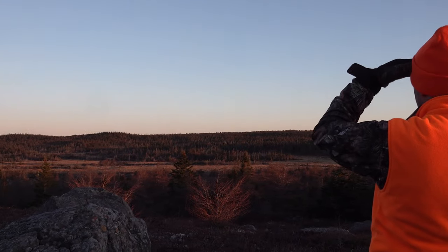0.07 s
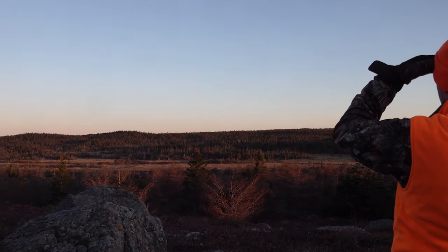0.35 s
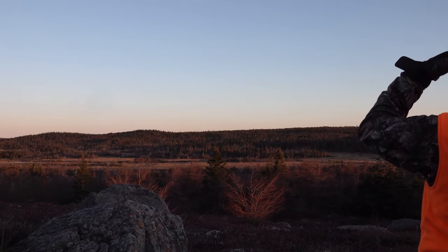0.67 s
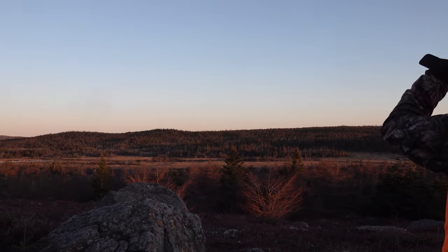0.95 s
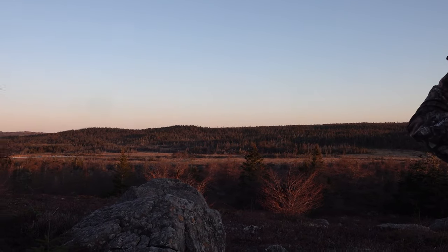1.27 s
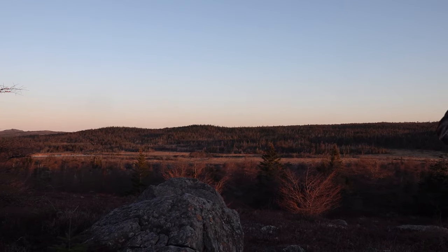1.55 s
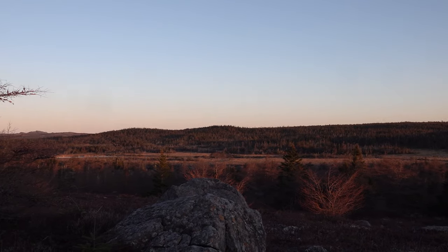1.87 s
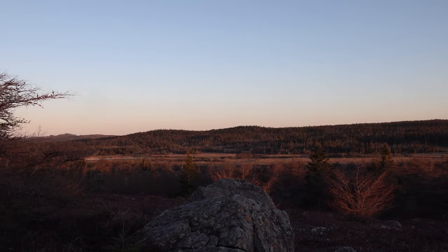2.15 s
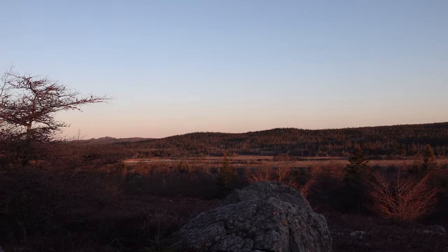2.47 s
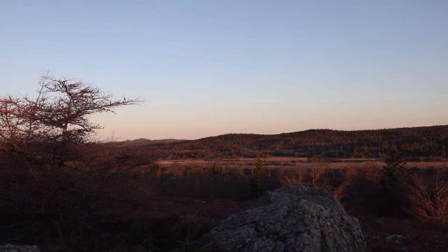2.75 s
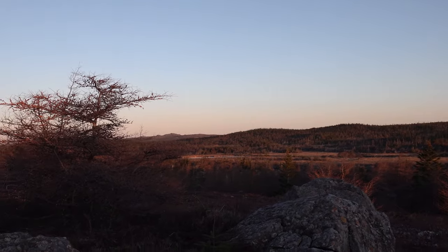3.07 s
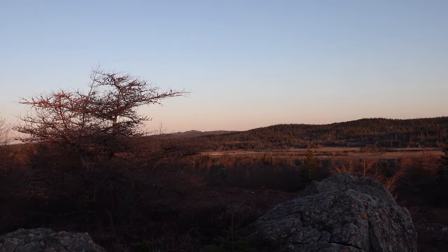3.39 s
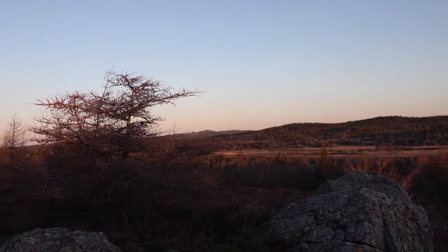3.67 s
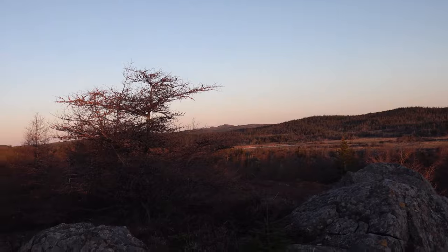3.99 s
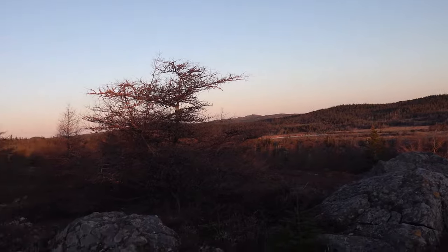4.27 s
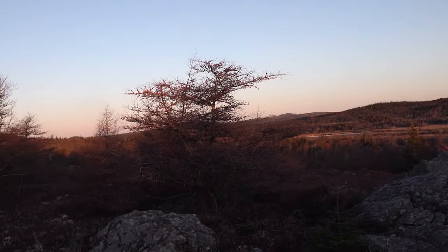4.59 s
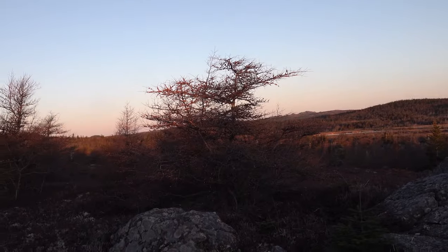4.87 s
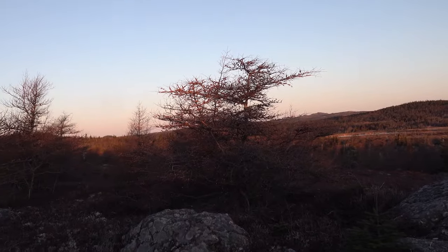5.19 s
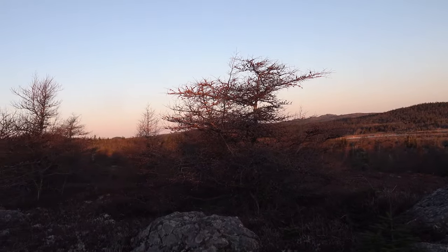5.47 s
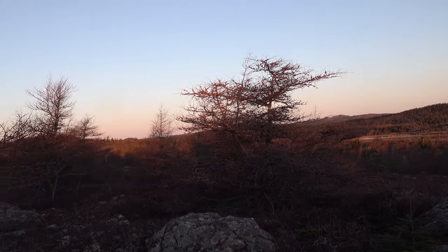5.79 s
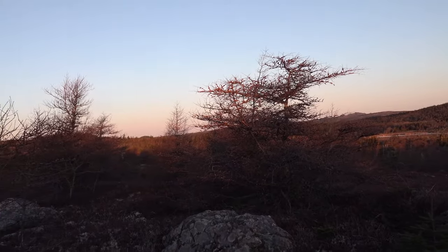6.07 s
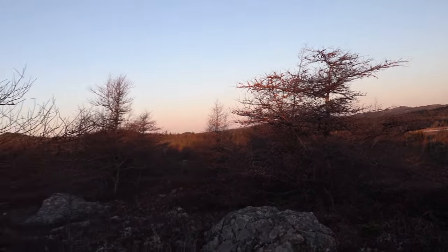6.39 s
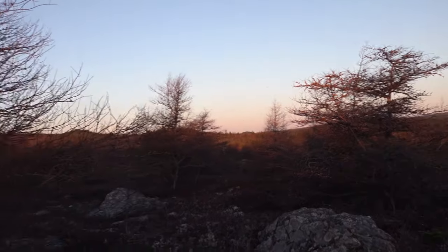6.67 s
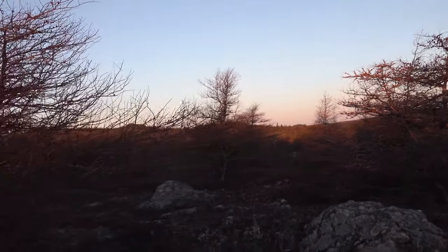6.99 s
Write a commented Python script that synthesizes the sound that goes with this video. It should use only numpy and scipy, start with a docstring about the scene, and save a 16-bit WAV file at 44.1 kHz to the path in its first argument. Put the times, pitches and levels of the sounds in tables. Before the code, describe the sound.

Wind buffets the microphone over two throbbing, idling quad engines, with rising metallic ticking and a few soft steps and twig snaps.

```python
"""Two single-cylinder quad bikes idle on a windy hilltop, their exhaust beats drifting in and out of step.
Each firing sends a pulse of gas down a pipe and makes it boom. Gusts buffet the hand-held microphone.
As it turns towards the nearer quad, that engine's knock and valve clatter grow while the exhausts fade.
Late in the turn, feet shift in the scrub: soft thuds, rustling and a few twig snaps."""
import sys
import numpy as np
from scipy import signal
from scipy.fft import rfft, irfft, next_fast_len
from scipy.io import wavfile
from scipy.ndimage import uniform_filter1d

SR = 44100
rng = np.random.default_rng(int(sys.argv[2]) if len(sys.argv) > 2 else 0)


def dump_mix(stems):
    """Bounce the given channels to the path in sys.argv[1] as a 16-bit WAV at rate SR."""
    frames = np.atleast_2d(stems).T  # one column per channel
    limited = np.clip(frames, -1, 1)  # hard clip at full scale
    pcm = np.round(limited * 32767).astype(np.int16)
    wavfile.write(sys.argv[1], SR, pcm)


N = 310464
T = np.arange(N) / SR


def gain_of(db):
    """Turns decibels into a number to multiply by."""
    return 10 ** (np.asarray(db) / 20)


def unit_power(x):
    """Scales a sound to an average power of 1."""
    return x / np.sqrt(np.mean(x ** 2) + 1e-20)


def curves(rows):
    """Draws each column of a table as a curve over the times in its first column."""
    times, *columns = np.transpose(rows)
    return [np.interp(T, times, column) for column in columns]


def coloured(x, colour):
    """Turns each frequency up or down as a colour table says."""
    size = next_fast_len(len(x) + 8192)
    size += size % 2
    hz, db = np.transpose(colour)
    bin_hz = np.fft.rfftfreq(size, 1 / SR)
    bin_db = np.interp(np.log(bin_hz + 1), np.log(hz + 1), db)
    # minimum phase: the ringing comes after each blow, never before
    cepstrum = irfft(np.log(gain_of(bin_db)))
    cepstrum[1:size // 2] *= 2
    cepstrum[size // 2 + 1:] = 0
    return irfft(rfft(x, size) * np.exp(rfft(cepstrum)))[:len(x)]


def noise(colour):
    """Steady noise of a given colour."""
    return unit_power(coloured(rng.standard_normal(N + SR), colour)[SR:])


def swells(rows):
    """Smooth rises and falls whose powers add; each length is the width at half power."""
    bumps = (gain_of(db) * 2 ** (-2 * ((T - crest) / length) ** 2) for crest, length, db in rows)
    return np.sqrt(sum(bump ** 2 for bump in bumps))


def firing_samples(speed, head_start):
    """The samples at which an engine fires; head_start is the share of a cycle already turned."""
    cycles = head_start + np.cumsum(curves(speed)[0]) / SR
    return np.flatnonzero(np.diff(np.floor(cycles)))


def pulse_train(firings, delay_ms, jitter_ms, spread_db):
    """One pulse for each firing, a little off in time and strength."""
    late, strong = rng.standard_normal((len(firings), 2)).T
    places = firings + np.round((delay_ms + jitter_ms * late) * SR / 1000).astype(int)
    inside = (places >= 0) & (places < N)
    return np.bincount(places[inside], gain_of(spread_db * strong)[inside], N)


def resonate(pulses, notes):
    """Each gas pulse makes the notes of a pipe or box swell and die away."""
    t = np.arange(SR // 6) / SR
    ms = t * 1000
    boom = sum(size * ms / rise * np.exp(1 - ms / rise) * np.sin(2 * np.pi * hz * t)
               for hz, rise, size in notes)
    return signal.oaconvolve(pulses, boom)[:N]


def noise_bursts(firings, bursts, steady_db, spread_db, grit):
    """Bursts of (delay ms, dB, decay ms) in every cycle, over a steady whirr; grit makes them grainy."""
    ms = np.arange(SR // 10) * 1000 / SR
    power = gain_of(2 * steady_db)
    for delay, db, decay in bursts:
        shape = gain_of(db) * np.exp(-ms / decay) * (1 - np.exp(-ms / .5))
        pulses = pulse_train(firings, delay, jitter_ms=.5, spread_db=spread_db)
        power = power + signal.oaconvolve(pulses ** 2, shape ** 2)[:N]
    grains = np.exp(grit * np.repeat(rng.standard_normal(N // 32 + 1), 32)[:N])
    return np.sqrt(abs(power)) * grains * rng.standard_normal(N)


def metal_ring(x, decay_s, ring_db):
    """Fins and covers ring on briefly after each impact."""
    t = np.arange(SR // 25) / SR
    tail = rng.standard_normal(len(t)) * np.exp(-t / decay_s)
    return x + gain_of(ring_db) * signal.oaconvolve(x, tail / np.linalg.norm(tail))[:N]


# The colour of rushing gas. Each row: frequency in Hz, relative level in dB.
GAS_COLOUR = [(60, -10.5), (150, 4), (300, -2.5), (400, -11), (520, -17), (800, -28), (3000, -52.5)]

def gas_puffs(firings, delay_ms, level_db):
    """Swirling gas leaves the tailpipe with every beat."""
    gas = noise_bursts(firings, [(delay_ms, 0, 28)], steady_db=-17, spread_db=1.2, grit=0)
    return gain_of(level_db) * unit_power(coloured(gas, GAS_COLOUR))


# Metal blows in one cycle. Each row: time after firing in ms, relative level in dB from the front,
# the same from the side, decay in ms.
KNOCK_BLOWS = [(-1.6, 1.2, -2.5, 3.5), (8.5, -6, -4.5, 6), (16, -6.5, -4.5, 7.5), (26, -11, -9.5, 15),
               (75, -14, -10, 16)]
# The casing's colour from the front and from the side. Each row: frequency in Hz, relative level in dB.
FRONT_COLOUR = [(350, -12), (650, -8), (1000, 1), (1400, -4.5), (1700, -4), (1880, 3), (2400, 3.5),
                (2950, -6), (3300, -1.5), (3750, 5.5), (4500, -2), (5600, -17), (7000, -26), (15000, -36)]
SIDE_COLOUR = [(350, -1), (650, -4), (880, 1), (980, 2), (1200, 2.5), (1500, -2.5), (1900, 3), (2500, 2.5),
               (2950, -3), (3650, -2), (4200, -10.5), (4900, -8.5), (6300, -20.5), (15000, -31)]
# Ringing engine covers. Each row: pitch in Hz, width in Hz, relative level in dB.
COVER_NOTES = [(980, 30, -4), (1880, 90, -5), (3630, 110, -14), (4500, 400, -9)]

def engine_knock(firings):
    """Each firing knocks the casing: sharpest from the front, with stronger later blows from the side."""
    turn_from_s, turn_to_s = 2.86, 6.38
    side_share = np.clip((T - turn_from_s) / (turn_to_s - turn_from_s), 0, 1)
    delay, front_db, side_db, decay = np.transpose(KNOCK_BLOWS)
    front = noise_bursts(firings, zip(delay, front_db, decay), steady_db=-18.5, spread_db=1.4, grit=.2)
    side = noise_bursts(firings, zip(delay, side_db, decay), steady_db=-19, spread_db=1.4, grit=.2)
    casing = np.sqrt(1 - side_share) * unit_power(coloured(front, FRONT_COLOUR))
    casing += np.sqrt(side_share) * unit_power(coloured(side, SIDE_COLOUR))
    covers = sum(gain_of(db) * signal.lfilter(*signal.iirpeak(hz, hz / width, SR), casing)
                 for hz, width, db in COVER_NOTES)
    return unit_power(metal_ring(casing + covers, decay_s=.008, ring_db=-11))


# Valve ticks in one cycle. Each row: time after firing in ms, relative level in dB, decay in ms.
TICKS = [(-2.2, 1, 3), (14, -7, 7), (27, -2.5, 15), (40, -10, 14)]
# Their bright colour. Each row: frequency in Hz, relative level in dB.
TICK_COLOUR = [(3000, -26), (6000, 10.5), (7400, 0.5), (9000, 5.5), (10400, 7), (12000, 0.5), (15800, 2)]

def valve_ticks(firings):
    """The valve parts tap metal on metal at the same points in every cycle."""
    ticks = noise_bursts(firings, TICKS, steady_db=-17.5, spread_db=2, grit=.42)
    ticks = metal_ring(ticks, decay_s=.003, ring_db=-6)
    return gain_of(-17.5) * unit_power(coloured(ticks, TICK_COLOUR))


# The near engine's wavering idle. Each row: time in seconds, firings per second.
NEAR_IDLE = [(0.0, 10.427), (0.28, 10.478), (0.53, 10.2), (1.46, 10.627), (1.97, 10.33), (2.46, 10.017),
             (2.62, 10.641), (3.42, 10.266), (3.71, 10.644), (4.13, 10.108), (4.35, 10.35), (4.88, 10.553),
             (5.08, 10.024), (5.43, 10.66), (5.84, 10.051), (6.16, 10.602), (7.04, 10.402)]
# How the exhausts grow and fade. Each row: time in seconds, near quad's gain in dB, far quad's in dB.
EXHAUST_GAINS = [(0, 4, -3.5), (1.3, 6, 2), (2.3, 6, 1), (2.9, 2.5, 0), (3.6, 2.5, 1.5), (5.3, 1.5, .5),
                 (6.4, 1, -6), (7.04, 1.5, -3)]
# The notes of the exhaust pipe and of the airbox, the engine's hollow air intake.
# Each row: pitch in Hz, rise time in ms, strength (a minus flips the wave).
NEAR_PIPE_NOTES = [(58.7, 50, -0.0045), (90.7, 6.36, 0.046), (103.35, 13.8, 0.028), (173, 15.7, -0.0016)]
AIRBOX_NOTES = [(242.8, 25, 0.0016), (262.2, 9.84, -0.0089), (343, 9.8, -0.0016)]
# How much clatter reaches the turning microphone. Each row: time in seconds, level in dB.
CLATTER_LEVELS = [(0, -70), (1.4, -56.5), (2.9, -50.5), (3.6, -45), (4.6, -45), (5.2, -44), (7.04, -42)]

def near_quad():
    """An exhaust beat, with a hollow airbox note and clatter that grow as the microphone turns."""
    firings = firing_samples(NEAR_IDLE, head_start=.432)
    pulses = pulse_train(firings, delay_ms=-4.4, jitter_ms=.2, spread_db=.5)
    exhaust = resonate(pulses, NEAR_PIPE_NOTES) + gas_puffs(firings, delay_ms=-2.5, level_db=-52)
    exhaust *= gain_of(curves(EXHAUST_GAINS)[0])
    # clatter and airbox dip briefly, then come back quickly
    dip_s, fall_s, rise_s, dip_db = 5.97, .17, .03, -6
    dip = np.exp(-((T - dip_s) / np.where(T < dip_s, fall_s, rise_s)) ** 2)
    clatter_db = curves(CLATTER_LEVELS)[0] + dip_db * dip
    clatter = gain_of(clatter_db) * (engine_knock(firings) + valve_ticks(firings))
    # one part of the airbox note follows the clatter; a steady part spreads all round
    airbox_gain = np.hypot(gain_of(clatter_db + 48), gain_of(-10))
    return exhaust + airbox_gain * resonate(pulses, AIRBOX_NOTES) + clatter


# The far engine's idle. Each row: time in seconds, firings per second.
FAR_IDLE = [(0.0, 10.103), (0.55, 10.426), (0.86, 10.304), (1.33, 10.435), (1.62, 10.621), (2.52, 10.393),
            (2.66, 10.654), (3.09, 10.301), (3.54, 10.855), (3.87, 10.286), (4.27, 10.686), (4.67, 10.092),
            (5.68, 10.712), (6.03, 10.236), (6.42, 10.388), (6.75, 9.859), (7.04, 10.424)]
# Its exhaust pipe. Each row: pitch in Hz, rise time in ms, strength (a minus flips the wave).
FAR_PIPE_NOTES = [(68.4, 8.8, 0.021), (94.6, 8.9, 0.056), (123.6, 14.8, -0.042), (163.3, 22, 0.0015),
                  (228.2, 19.2, 0.0061), (278.7, 12.6, 0.00666), (400, 3.7, -0.00032)]
# Its casing's colour. Each row: frequency in Hz, relative level in dB.
CHATTER_COLOUR = [(350, -4.5), (700, -2.5), (1000, -1.5), (1500, 1.5), (1820, 4.5), (2050, -1.5), (2450, 2),
                  (3100, -4), (3800, -1.5), (4600, -1), (5600, -9), (10000, -19), (12000, -26),
                  (15800, -51)]

def far_quad():
    """Gas pulses boom in a second pipe, with only a soft chatter of metal."""
    firings = firing_samples(FAR_IDLE, head_start=.856)
    pulses = pulse_train(firings, delay_ms=-3.5, jitter_ms=.2, spread_db=.5)
    exhaust = resonate(pulses, FAR_PIPE_NOTES) + gas_puffs(firings, delay_ms=.85, level_db=-51)
    blows = [(10, -6, 10), (33, 0, 9), (49, 0, 10)]
    chatter = noise_bursts(firings, blows, steady_db=-6, spread_db=1.3, grit=.2)
    chatter = metal_ring(chatter, decay_s=.015, ring_db=-8)
    chatter = gain_of(-53.5) * unit_power(coloured(chatter, CHATTER_COLOUR))
    return gain_of(curves(EXHAUST_GAINS)[1]) * (exhaust + chatter)


# The outdoor background. Each row: frequency in Hz, relative level in dB.
AIR_COLOUR = [(45, 25.5), (110, 25.5), (180, -0.5), (280, 0.5), (400, -2), (700, -3.5), (1100, -3.5),
              (1900, -0.5), (3000, -6), (4200, -4), (6000, -16), (10000, -22), (12000, -23.5), (15800, -23)]

def open_air(level_db):
    """A steady low rumble with a faint hiss."""
    return gain_of(level_db) * noise(AIR_COLOUR)


# The deep colour of wind on the microphone. Each row: frequency in Hz, relative level in dB.
WIND_COLOUR = [(1, -30), (4, -9), (8, 0), (10, 0), (13, -10), (20, -14), (27, -26), (33, -31), (42, -30),
               (55, -36), (80, -50), (200, -68), (600, -95), (2000, -140)]
# Gusts. Each row: time of the peak in seconds, length in seconds, relative level in dB.
WIND_GUSTS = [(.74, 0.15, -11.5), (1.5, 0.42, -8), (2.45, 0.41, -10.5), (3.8, 0.27, -7.5),
              (4.4, 0.22, -15.5), (4.9, 0.1, -8), (5.15, 0.16, -7), (5.85, 0.22, -4), (6.8, 0.61, -15.5)]

def wind():
    """Gusts over a light breeze push on the microphone in slow swings, their peaks rounded off."""
    breeze_db, ceiling = -16.5, .68
    strength = np.hypot(swells(WIND_GUSTS), gain_of(breeze_db))
    swings = noise(WIND_COLOUR)
    # even out the noise so that the gusts set its size
    power = uniform_filter1d(abs(signal.hilbert(swings)) ** 2 / 2, size=SR // 8)
    swings /= np.sqrt(power + 1e-6)
    return ceiling * np.tanh(strength * swings / ceiling)


def hits(rows, colour, decay_s, boost_db):
    """Short dry blows, each a dying puff of noise."""
    track = np.zeros(N)
    t = np.arange(SR // 12) / SR
    for start_s, db in rows:
        blow = coloured(rng.standard_normal(len(t)) * np.exp(-t / decay_s), colour)
        slot = track[round(start_s * SR):][:len(blow)]
        slot += gain_of(db + boost_db) * blow[:len(slot)] / abs(blow).max()
    return track


# Footfalls and bumps. Each row: start in seconds, relative level in dB.
FOOTFALLS = [(2.568, -41.5), (3.666, -39), (4.892, -36), (5.1, -37.5), (5.128, -39), (5.162, -35.5),
             (5.444, -43), (5.63, -38), (5.647, -35), (5.69, -39), (5.773, -34), (5.913, -31.5),
             (6.69, -37.5)]
# Their dull colour. Each row: frequency in Hz, relative level in dB.
FOOT_COLOUR = [(80, 0), (300, -2), (700, -1.5), (1000, -8.5), (1600, -13.5), (4000, -24), (12000, -45)]

def footfalls():
    """Shifting feet thud softly on the ground, with five lighter scuffs at random moments."""
    from_s, to_s, scuff_db, spread_db = 4.65, 6.15, -44, 5
    when, strong = rng.random((5, 2)).T
    scuffs = zip(from_s + when * (to_s - from_s), scuff_db + spread_db * (2 * strong - 1))
    return hits(FOOTFALLS + list(scuffs), FOOT_COLOUR, decay_s=.011, boost_db=7)


# Clothes brushing the scrub. Each row: time of the peak in seconds, length in seconds, relative dB.
RUSTLES = [(4.85, 0.3, -52.5), (5.19, 0.26, -47), (5.44, 0.093, -46.5), (5.6, 0.15, -47),
           (5.86, 0.064, -50), (6.32, 0.21, -49.5), (6.5, .2, -46.5)]
# The colour of their hiss. Each row: frequency in Hz, relative level in dB.
RUSTLE_COLOUR = [(200, -1.5), (500, -1.5), (1200, 2.5), (2000, -3), (3300, -1), (5000, -1), (6300, -7),
                 (8500, -9.5), (11000, -19), (15800, -22)]

def rustling():
    """Fibres and stalks slip past each other in uneven strokes: a hiss with bright, twig-like crackles."""
    flutter = gain_of(1.8 * noise([(3, -30), (8, 0), (30, 0), (70, -30), (300, -90)]))
    slips_per_s = 350
    slips = (rng.random(N) < slips_per_s / SR) * rng.standard_normal(N)
    slips *= gain_of(4 * np.minimum(rng.exponential(1, N), 3.5))  # a few stand out
    crackle = gain_of(-10) * unit_power(coloured(slips, TWIG_COLOUR))
    return swells(RUSTLES) * flutter * (noise(RUSTLE_COLOUR) + crackle)


# Breaking twigs. Each row: start in seconds, relative level in dB.
TWIGS = [(5.0657, -33.5), (5.578, -32), (5.62, -38.5), (5.7337, -40), (6.2919, -34), (6.3588, -40),
         (6.3822, -36), (6.484, -34.5)]
# Their sharp colour. Each row: frequency in Hz, relative level in dB.
TWIG_COLOUR = [(500, -1), (2000, -9), (4500, 10), (8000, -1), (15800, -13)]

def twig_snaps():
    """Twigs break underfoot, each with one tiny, bright crack."""
    return hits(TWIGS, TWIG_COLOUR, decay_s=.00048, boost_db=9.5)


# The colour of the difference between left and right. Each row: frequency in Hz, gain in dB.
STEREO_COLOUR = [(10, -8), (30, -12.5), (70, -22), (150, -23), (500, -12), (1200, -45), (16000, -55)]

def scene():
    """Both quads, the hilltop air and the shifting feet, almost the same in both ears."""
    middle = footfalls() + twig_snaps() + open_air(level_db=-44.5) + near_quad() + far_quad() + rustling()
    # the microphone's two openings lie close together: only the wind differs much between them
    difference = coloured(gain_of(-4) * wind() + open_air(level_db=-54), STEREO_COLOUR)
    stereo = np.array([middle + difference, middle - difference]) * gain_of([[.08], [-.08]])
    return stereo + wind() * gain_of([[0], [-1]])


def record(dry):
    """Cuts off the very highest treble."""
    cutoff_hz = 15800
    lowpass = signal.firwin(511, cutoff_hz, window=("kaiser", 9), fs=SR)
    return signal.oaconvolve(dry, lowpass[None], "same")


dry = scene()
out = record(dry)
dump_mix(out)
```